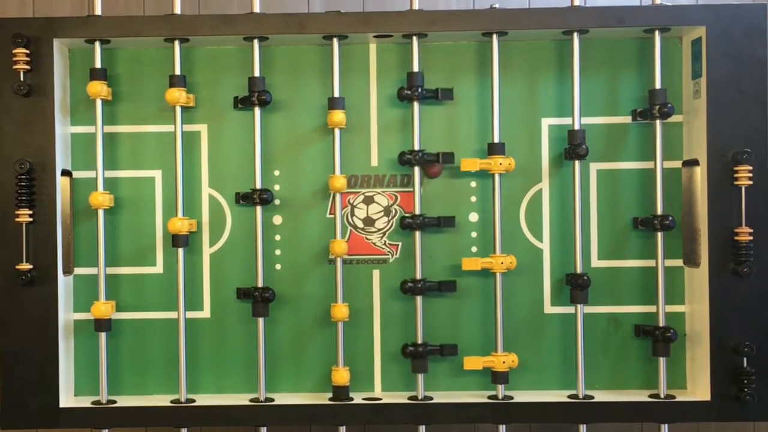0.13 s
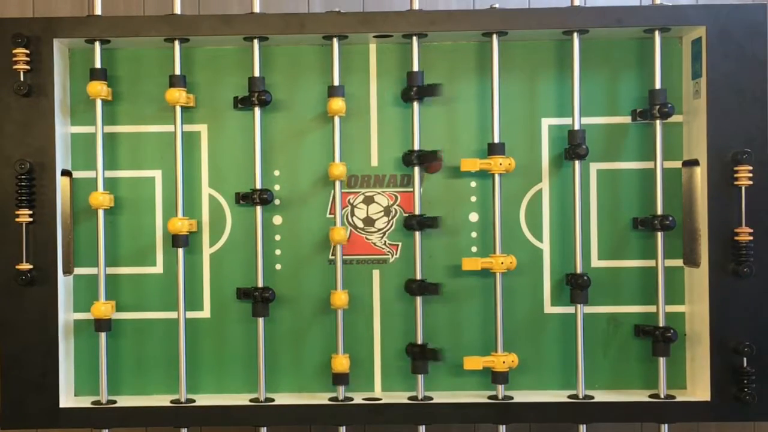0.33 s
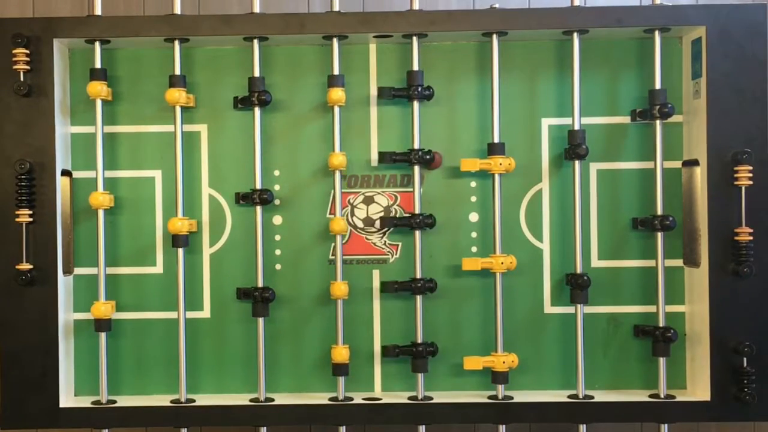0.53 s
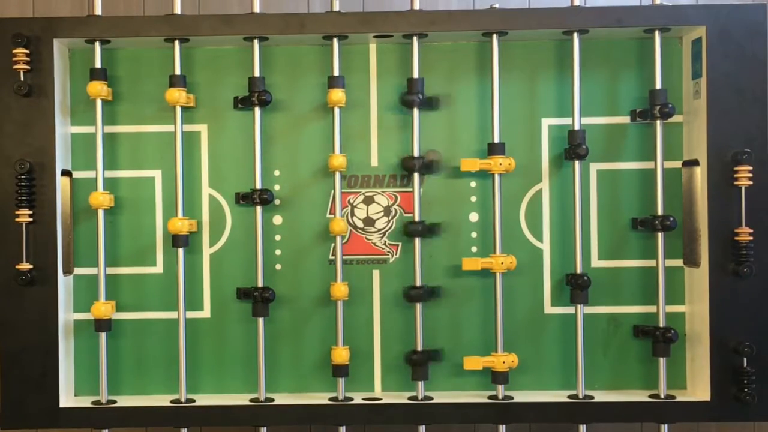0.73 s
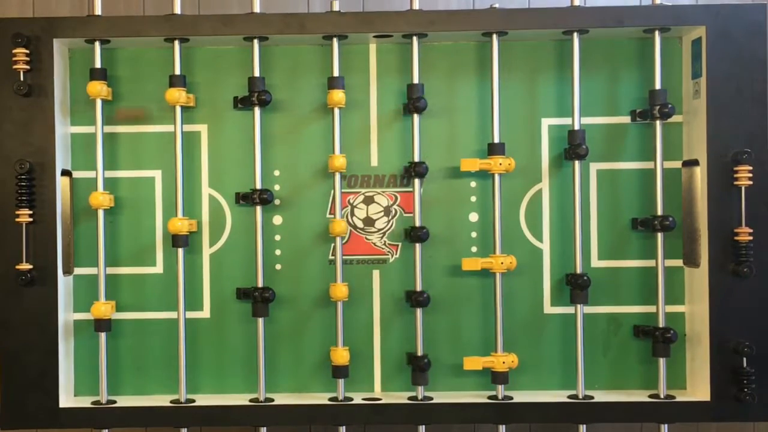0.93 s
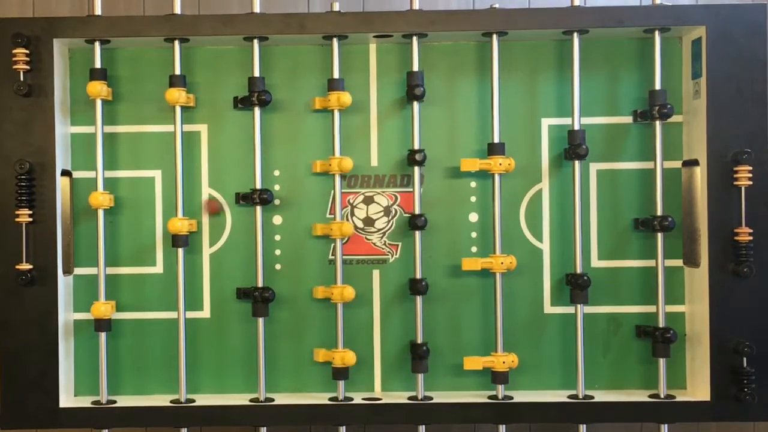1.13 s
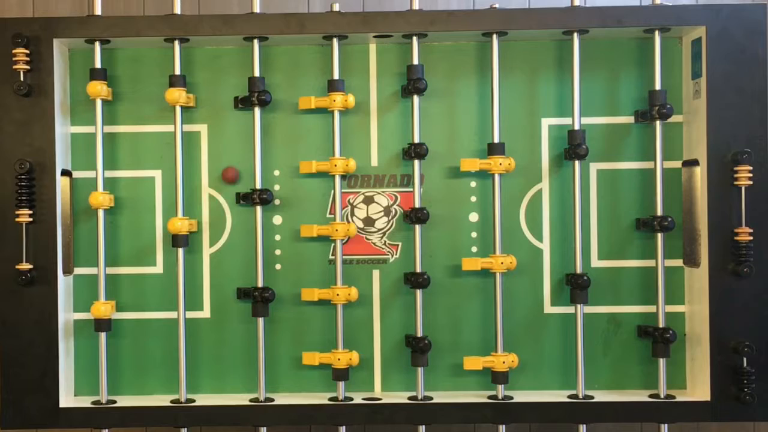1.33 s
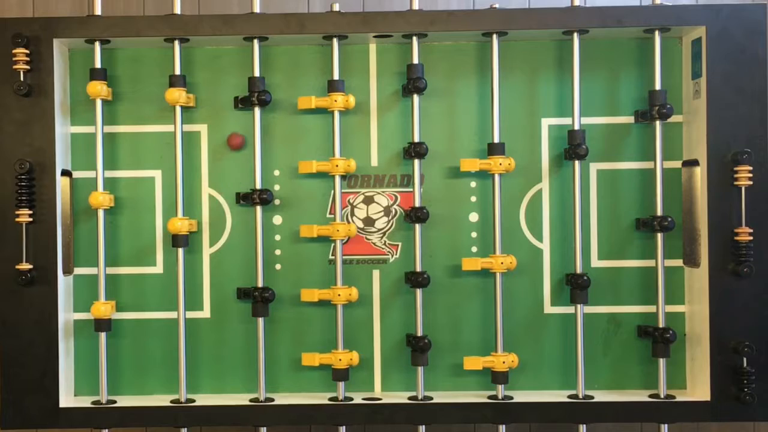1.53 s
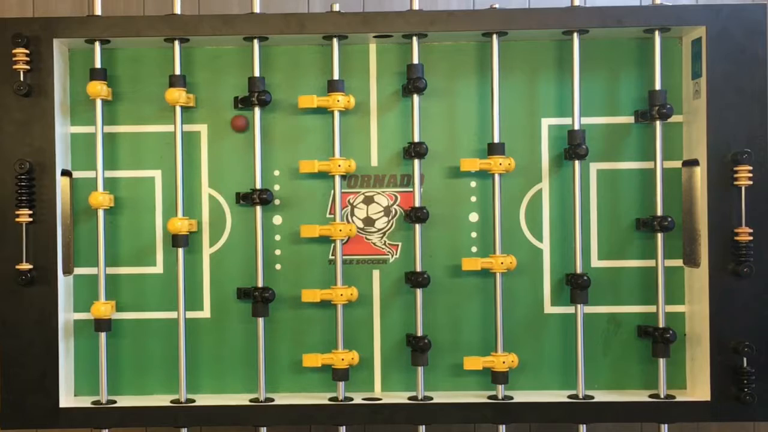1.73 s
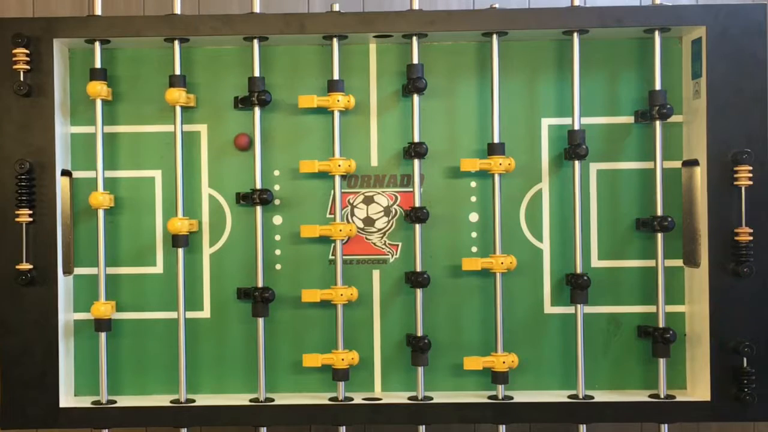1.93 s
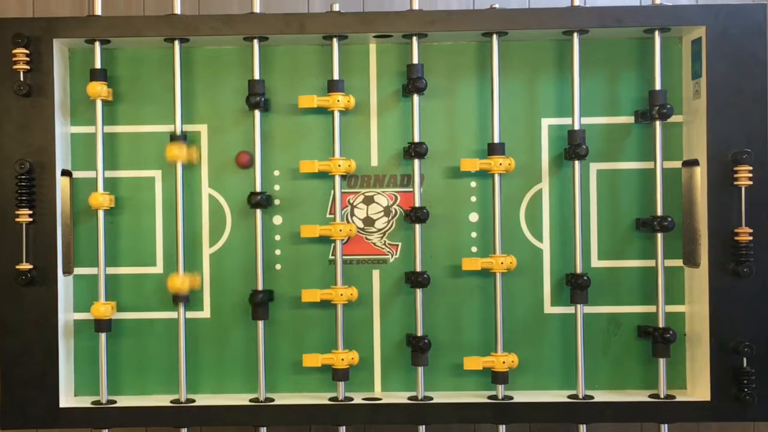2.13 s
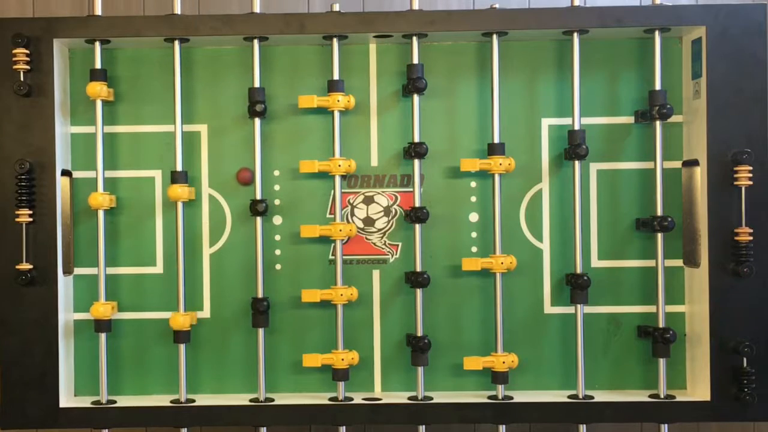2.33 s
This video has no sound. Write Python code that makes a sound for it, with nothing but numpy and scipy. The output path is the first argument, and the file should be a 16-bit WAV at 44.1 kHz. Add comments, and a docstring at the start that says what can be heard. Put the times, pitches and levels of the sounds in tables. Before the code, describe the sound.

A hard foosball strike and clack, followed by quickening knocks as the ball settles.

```python
"""A foosball shot in a live room, heard from one microphone above the table.
A figure cracks against the ball and the cabinet thumps; the ball clacks against the far end,
bounces on the playfield in fading knocks and rolls out. Around the shot, steel rods slide,
scrape and bump in their bearings. A low room rumble lies under it all."""
import sys
import numpy as np
from scipy import signal
from scipy.io import wavfile

SR = 44100
rng = np.random.default_rng(int(sys.argv[2]) if len(sys.argv) > 2 else 0)


def pcm_store(signal):
    """Save signal as 16-bit PCM."""
    levels = np.round(np.clip(np.atleast_2d(signal), -1, 1) * 32767)
    wavfile.write(sys.argv[1], SR, levels.astype(np.int16).T)


N = 109941

# Spectra of the shot, far-end clack, landings and their ticks: (frequency [Hz], relative level [dB])
SHOT_SPECTRUM = [(35, -19.5), (75, -2), (220, -8), (330, -11.5), (650, -15), (860, -17.5), (2100, -28),
                 (2660, -46.5), (3700, -31), (5000, -37), (7500, -44.5), (16000, -54.5)]
CLACK_SPECTRUM = [(60, -19), (170, -14), (290, 1.5), (520, -23.5), (800, -3), (980, -7.5), (1250, -4.5),
                  (1700, -10.5), (1900, -10), (2450, -19), (3050, -10.5), (4900, -24.5), (6000, -20.5),
                  (7600, -32.5), (11500, -30), (16000, -40)]
BOUNCE_SPECTRUM = [(60, 1.5), (90, 2.5), (220, 3.5), (570, 0), (780, 1), (1080, 1.5), (1450, 0),
                   (1900, -5.5), (2800, -5), (5000, -40)]
TICK_SPECTRUM = [(3000, 13), (5000, 3), (6700, 3), (8000, -1), (9500, 1.5), (16000, -12)]
# Resonances of the struck parts: (frequency [Hz], relative level [dB], t60 [s])
CABINET_MODES = [(54, -9, .3), (93, -6.5, .25), (122, -9.5, .22), (188, -9, .24), (256, -14, .24),
                 (296, -15, .25), (335, -17, .2), (587, -21, .25), (778, -23, .22)]
FIGURE_MODES = [(211.5, -3.5, .06), (3811, -27, .11), (4030, -3.5, 0.0091), (5700, -15, 0.012),
                (8440, -40, .11), (9330, -36.5, .18)]
FAR_END_MODES = [(868, -15, 0.15), (1142, -13, 0.077), (1271, -16.5, 0.091), (1900, -24.5, 0.2),
                 (3010, -27.5, 0.089), (3290, -24.5, 0.0994), (5873, -32.5, .15), (6864, -35, .08),
                 (11600, -31, 0.07)]
PLAYFIELD_MODES = [(212.6, -37.5, 0.22), (518, -38, 0.074), (587.2, -38.5, 0.21), (650.5, -41, 0.33),
                   (1081, -36, 0.19), (1412, -44.5, 0.3)]
BALL_MODES = [(6600, -43.5, 0.17), (8300, -43, 0.12)]
STEEL_MODES = [(12580, -31, .09), (13140, -30, .09), (13700, -31, .11)]
# Ball landings: (time [s], knock level [dB], contact cut-off [Hz], tick level [dB], spot resonance [Hz])
LANDINGS = [(1.0686, 13.5, 3270, -12.5, 1086), (1.215, 14, 2370, -14, 1034), (1.3789, 11, 2100, -16, 1806),
            (1.4849, 6.5, 2170, -21.5, 1050), (1.5610, 1, 2100, -27.5, 1310), (1.6150, 0, 1870, -33, 1365),
            (1.6550, -3, 1510, -41, 1480), (1.6860, -7.5, 1400, -54, 1450)]
# Rods hitting their stops, and at 0.932 s the figure rebounding after the shot: (time [s], thud level [dB],
# rattle level [dB])
ROD_BUMPS = [(0.015, 0, -30.5), (0.704, -11, -30), (0.872, -3, -27), (0.932, 2, -25), (1.743, -29, -29.5),
             (1.964, -8, -32), (1.996, -3.5, -22)]
# Thin metallic tinks: (time [s], level [dB])
ROD_TINKS = [(1.0265, -17.5), (1.155, -22.5)]
# Loudness of the rolling ball and the sliding rods: (time [s], level [dB])
ROLL_LEVELS = [(0, -40.5), (0.19, -50.5), (0.3, -58.5), (0.42, -50), (0.55, -58.5), (1.45, -42.5),
               (1.62, -38), (1.74, -39.5), (1.82, -49.5), (1.92, -57), (2.02, -50), (2.49, -56.5)]
SLIDE_LEVELS = [(0, -67), (0.2, -62), (0.28, -76.5), (0.4, -63), (0.52, -74), (0.7, -76.5), (0.83, -46.5),
                (0.9, -63), (1.93, -77), (2.02, -63.5), (2.13, -57), (2.32, -60), (2.4, -73)]
# A dry bearing, rising in pitch as the rod speeds up: (time [s], frequency [Hz], level [dB])
SCRAPE_PATH = [(2.04, 5200, -79), (2.12, 5600, -62), (2.24, 6930, -68), (2.39, 6900, -75.5)]
# Spectra of the rolling ball, the rod noises and the room rumble: (frequency [Hz], relative level [dB])
ROLL_SPECTRUM = [(70, -19.5), (110, 0.5), (300, 0), (650, -8.5), (1450, -13.5), (2500, -29.5), (4000, -36)]
THUD_SPECTRUM = [(35, -18), (70, 8.5), (130, -21), (300, -17.5), (900, -63), (2000, -44.5)]
RATTLE_SPECTRUM = [(800, 12), (2200, 4.5), (4500, 3), (7000, -4), (16000, -19)]
TINK_SPECTRUM = [(9000, -14), (11500, -11), (13000, -6), (15500, -7)]
SLIDE_SPECTRUM = [(1500, -20.5), (2200, -10.5), (4500, -10), (6000, -6), (7600, -8.5), (12700, -12.5),
                  (16000, -18.5)]
RUMBLE_SPECTRUM = [(22, -9.5), (64, -1), (125, -3.5), (165, -18.5), (550, -23.5), (950, -32.5),
                   (6600, -51.5), (16000, -69.5)]
# Decay of the table and of the room around it: (frequency [Hz], t60 [s])
TABLE_DECAY = [(60, 0.254), (250, 0.18), (1000, 0.24), (3000, 0.13), (12000, 0.2)]
ROOM_DECAY = [(60, 0.37), (250, 0.42), (1200, 0.66), (3000, 0.33), (7000, 0.3), (15000, 0.13)]

SNAP_T60_S, TABLE_BUILD_S, ROOM_BUILD_S = .0087, .0018, .028
ECHO_S, ECHO_DB = .0054, -2   # first reflection
SLIDE_GRAIN_DB, GRAINS_PER_S = 2, 76   # uneven friction
TIME = np.arange(N) / SR
RING_TIME = TIME[:int(1.3 * SR)]
BAND_EDGES_HZ = 22 * 2 ** (np.arange(30) / 3)


def shot():
    """The swing jolts the cabinet, the figure cracks the ball, the cabinet booms and the rod shudders."""
    out = np.zeros(N)
    hit_s, lead_s, swing_hz = .7976, .015, 100
    t = TIME[:int(lead_s * SR)]
    add(out, hit_s - lead_s, from_db(-15) * t / lead_s * np.sin(2 * np.pi * swing_hz * t))
    add(out, hit_s, from_db(24.5) * impact(SHOT_SPECTRUM, noise_pair(), snap_db=-5, room_db=-7.5))
    add(out, hit_s, ring(CABINET_MODES + FIGURE_MODES, spread_db=.5))
    bearing_buzz = grainy_noise(TICK_SPECTRUM, SLIDE_GRAIN_DB)[:len(RING_TIME)]
    add(out, hit_s, from_db(-32.5) * fade(t60=.36) * bearing_buzz)
    return out


def clack():
    """The ball hits the far end hard and sets it ringing."""
    out, hit_s = np.zeros(N), .964
    add(out, hit_s, from_db(16.5) * impact(CLACK_SPECTRUM, noise_pair(), snap_db=3, room_db=-4))
    add(out, hit_s, ring(FAR_END_MODES, spread_db=1))
    return out


def bounces():
    """Each landing ticks and rings the playfield at a new spot; slower landings are duller."""
    out, common = np.zeros(N), noise_pair()
    common_share, spot_db, spot_t60_s = .18, -30.5, .062
    for s, knock_db, contact_hz, tick_db, spot_hz in LANDINGS:
        white = np.sqrt(common_share) * common + np.sqrt(1 - common_share) * noise_pair()
        knock = impact(BOUNCE_SPECTRUM, white, snap_db=2, room_db=-9)
        knock += ring(PLAYFIELD_MODES + [(spot_hz, spot_db, spot_t60_s)], spread_db=3.5)
        contact = signal.butter(7, contact_hz, fs=SR, output="sos")
        add(out, s, from_db(knock_db) * signal.sosfilt(contact, knock))
        first_touch = from_db(-4) * unit(rng.standard_normal(len(RING_TIME)) * fade(t60=.008))
        ball_ring = ring(BALL_MODES, spread_db=2)
        tick = impact(TICK_SPECTRUM, noise_pair(), snap_db=2.5, room_db=-5)
        add(out, s, from_db(tick_db) * (first_touch + ball_ring + tick))
    return out


def rolling_ball():
    """The ball rumbles unevenly over the playfield below the microphone."""
    return envelope(ROLL_LEVELS) * grainy_noise(ROLL_SPECTRUM, grain_db=3.5)


def rods():
    """Steel rods hiss and scrape in their bearings, bump at their stops and tink; the figure knocks back once
    after the shot."""
    out = envelope(SLIDE_LEVELS) * grainy_noise(SLIDE_SPECTRUM, SLIDE_GRAIN_DB) + bearing_scrape()
    for s, thud_db, rattle_db in ROD_BUMPS:
        add(out, s, from_db(thud_db) * impact(THUD_SPECTRUM, noise_pair(), snap_db=-8.5, room_db=-12))
        add(out, s, from_db(rattle_db) * impact(RATTLE_SPECTRUM, noise_pair(), snap_db=-8, room_db=-18))
    for s, db in ROD_TINKS:
        tink = impact(TINK_SPECTRUM, noise_pair(), snap_db=6, room_db=-22)
        add(out, s, from_db(db) * (tink + ring(STEEL_MODES, spread_db=0)))
    return out


def bearing_scrape(half_width_hz=270):
    """Uneven slips in a dry bearing excite one narrow, rising resonance."""
    s, hz, db = np.transpose(SCRAPE_PATH)
    narrow = signal.sosfilt(signal.butter(2, half_width_hz, fs=SR, output="sos"), noise_pair())
    phase = 2 * np.pi * np.cumsum(np.interp(TIME, s, hz)) / SR
    resonance = narrow[0] * np.cos(phase) + narrow[1] * np.sin(phase)
    slips = from_db(SLIDE_GRAIN_DB * np.interp(TIME * GRAINS_PER_S, np.arange(N), rng.standard_normal(N)))
    level = from_db(np.interp(TIME, s, db)) * (TIME > s[0]) * (TIME < s[-1])
    return level * unit(slips * resonance) * np.sqrt(N)


def room_tone():
    """The room's low, nearly even rumble."""
    return from_db(-43.5) * grainy_noise(RUMBLE_SPECTRUM, grain_db=1)


def impact(spectrum, white, snap_db, room_db):
    """One contact at the microphone: snap and first reflection, the table's ring, the room's tail."""
    out, energy = 0, 0
    direct = fade(SNAP_T60_S)
    echo = from_db(ECHO_DB) * np.pad(direct, (int(ECHO_S * SR), 0))[:len(RING_TIME)]
    snap = from_db(snap_db) * unit(np.hypot(direct, echo))
    for hz, gain, band in bands(spectrum, white):
        table = unit(fade(at_hz(TABLE_DECAY, hz)) * (1 - np.exp(-RING_TIME / TABLE_BUILD_S)))
        room = unit(fade(at_hz(ROOM_DECAY, hz)) * (1 - np.exp(-RING_TIME / ROOM_BUILD_S)))
        shape = np.sqrt(snap ** 2 + table ** 2 + (from_db(room_db) * room) ** 2)
        onset = 1 - np.exp(-2 * hz * RING_TIME)   # low bands start more slowly
        out += gain * unit(band[-len(RING_TIME):] * shape * onset)
        energy += gain ** 2
    return out / np.sqrt(energy)


def ring(modes, spread_db):
    """Damped sines of alternating sign, each struck with a strength of its own."""
    out = 0
    for k, (hz, db, t60) in enumerate(modes):
        strength = (-1) ** k * from_db(db + spread_db * rng.normal())
        out += strength * fade(t60) * np.sin(2 * np.pi * hz * RING_TIME)
    return out


def grainy_noise(spectrum, grain_db):
    """Coloured noise of rms one; each band flickers on its own."""
    out, knots = 0, np.arange(0, TIME[-1] + 1, 1 / GRAINS_PER_S)
    for _, gain, band in bands(spectrum, noise_pair()):
        flicker = np.interp(TIME, knots, rng.standard_normal(2000)[:len(knots)])
        out += gain * unit(band * from_db(grain_db * flicker))
    return unit(out) * np.sqrt(N)


def bands(spectrum, white):
    """Yield centre, gain and noise for each third octave of a spectrum."""
    for k, (low, high) in enumerate(zip(BAND_EDGES_HZ, BAND_EDGES_HZ[1:])):
        if high > spectrum[0][0] and low < spectrum[-1][0]:
            hz = np.sqrt(low * high)
            gain = from_db(at_hz(spectrum, hz)) * np.sqrt(high - low)
            bandpass = signal.butter(3, [low, high], "band", fs=SR, output="sos")
            yield hz, gain, signal.sosfilt(bandpass, white[k % 2])


def noise_pair():
    """Two independent white noises."""
    return rng.standard_normal((2, N))


def from_db(db):
    """Decibels to gain."""
    return 10 ** (np.asarray(db) / 20)


def unit(x):
    """Scale to energy one."""
    return x / np.sqrt(np.sum(x ** 2) + 1e-20)


def at_hz(points, hz):
    """Read a table on a log-frequency axis."""
    frequencies, values = np.transpose(points)
    return np.interp(np.log(hz), np.log(frequencies), values)


def envelope(levels):
    """Gain through points of (time [s], level [dB])."""
    return from_db(np.interp(TIME, *np.transpose(levels)))


def fade(t60):
    """Fall by 60 dB every t60 seconds."""
    return from_db(-60 * RING_TIME / t60)


def add(out, s, sound):
    """Mix a sound in at time s."""
    start = int(s * SR)
    out[start:start + len(sound)] += sound[:N - start]


def scene():
    """Ball, rods and room in mono, from above the table."""
    roll = rolling_ball()
    return (shot() + clack() + bounces() + roll + rods() + room_tone())[None]


def record(dry, low_cut_hz=32, high_cut_hz=15750):
    """The deepest bass is trimmed away, the loudest peaks are rounded off and the top is cut."""
    trimmed = signal.sosfilt(signal.butter(2, low_cut_hz, "high", fs=SR, output="sos"), dry)
    rounded = trimmed / (1 + trimmed ** 6) ** (1 / 6)
    return signal.sosfilt(signal.ellip(10, .1, 70, high_cut_hz, fs=SR, output="sos"), rounded)


dry = scene()
out = record(dry)
pcm_store(out)
```